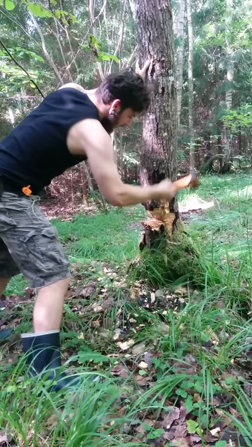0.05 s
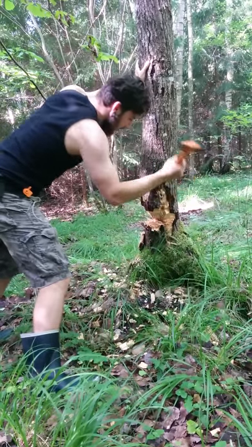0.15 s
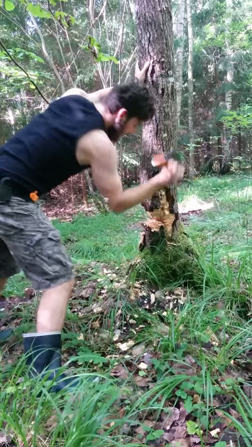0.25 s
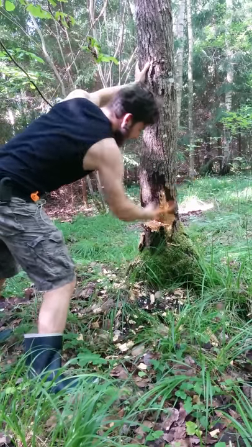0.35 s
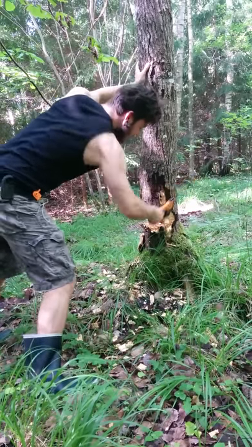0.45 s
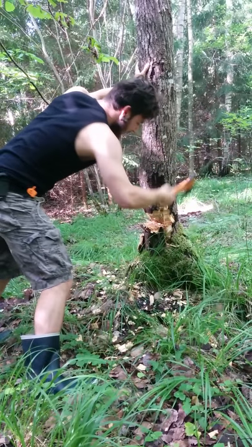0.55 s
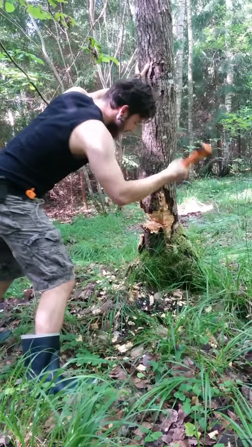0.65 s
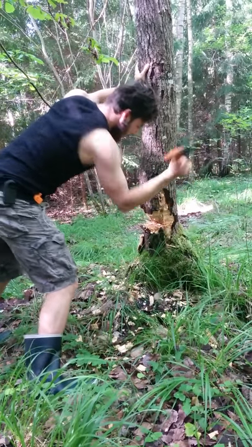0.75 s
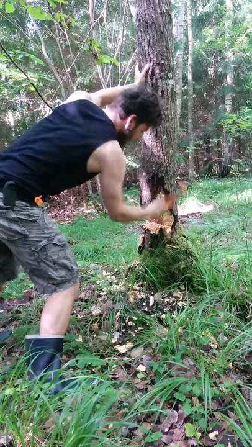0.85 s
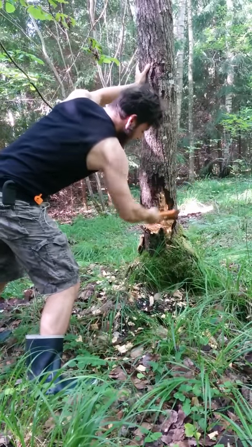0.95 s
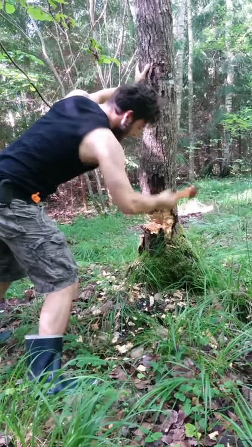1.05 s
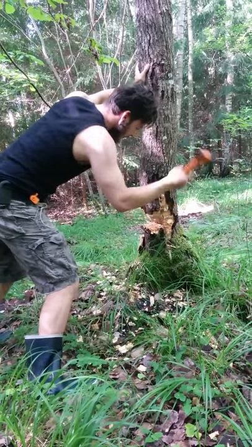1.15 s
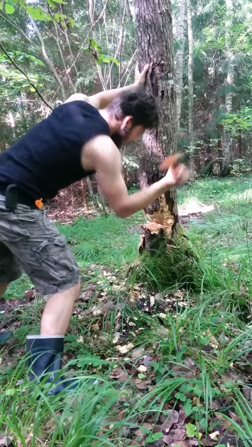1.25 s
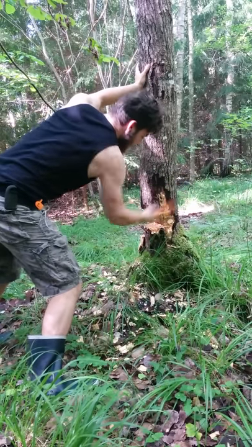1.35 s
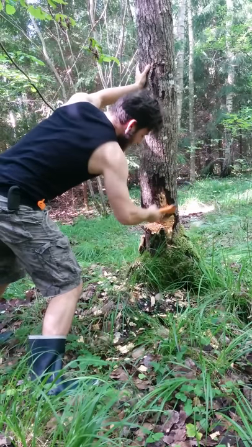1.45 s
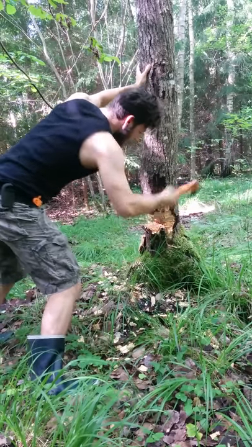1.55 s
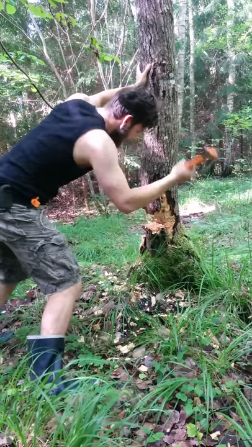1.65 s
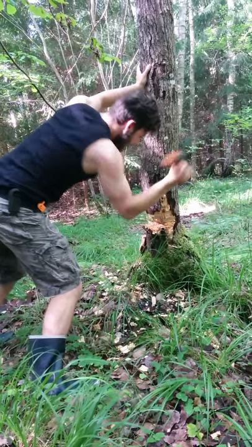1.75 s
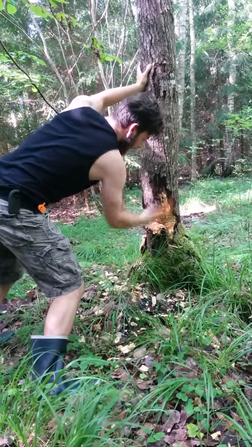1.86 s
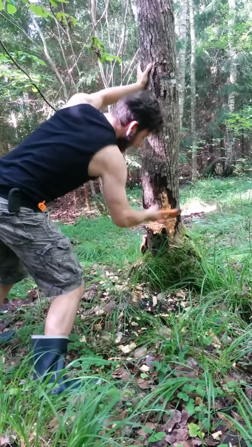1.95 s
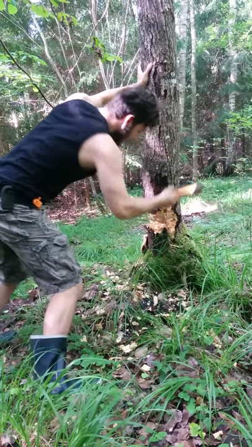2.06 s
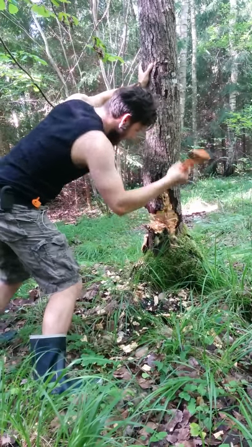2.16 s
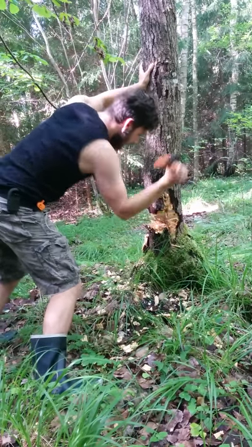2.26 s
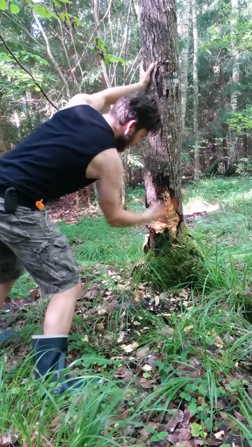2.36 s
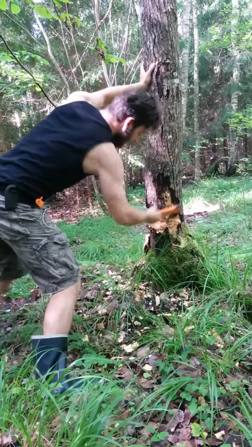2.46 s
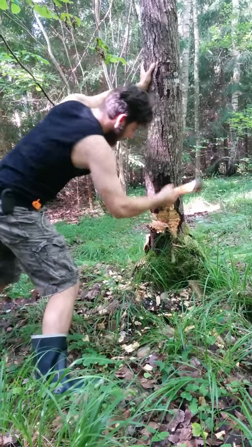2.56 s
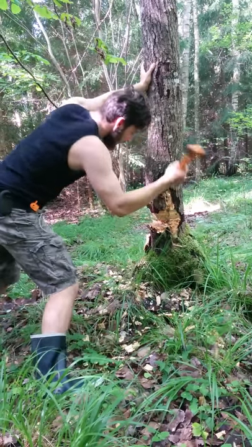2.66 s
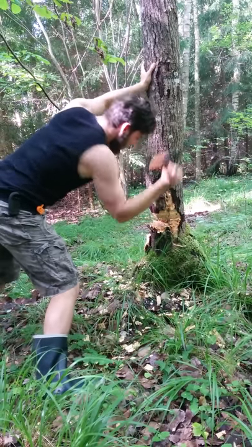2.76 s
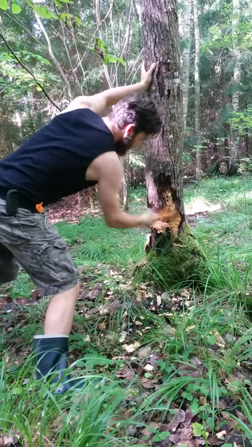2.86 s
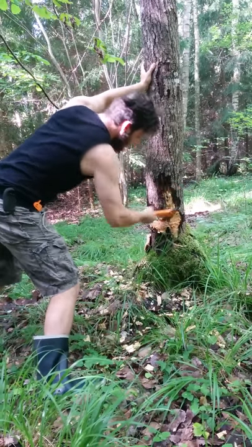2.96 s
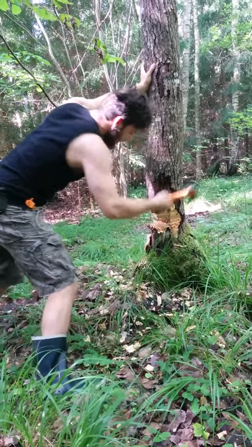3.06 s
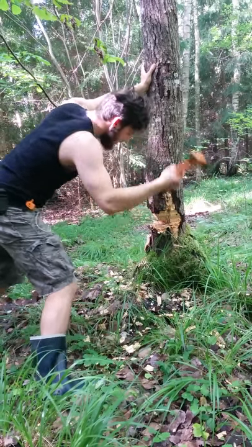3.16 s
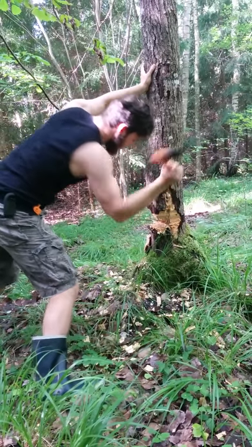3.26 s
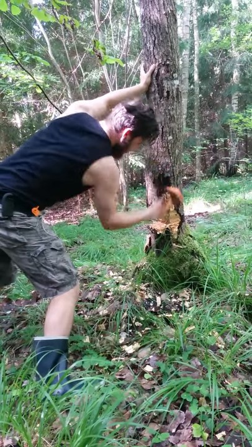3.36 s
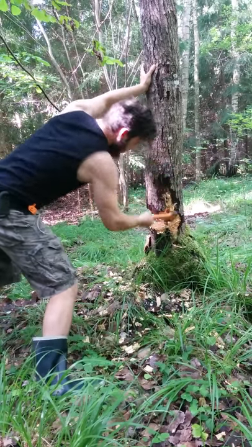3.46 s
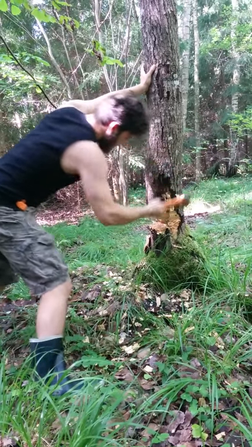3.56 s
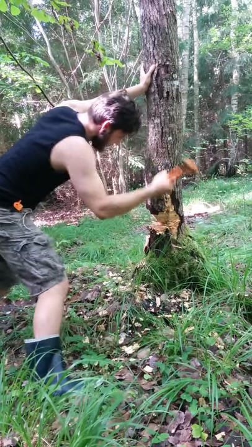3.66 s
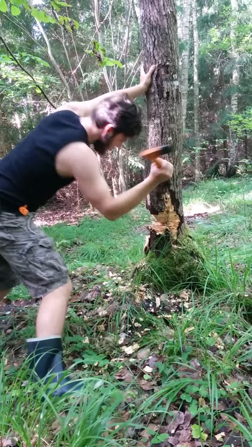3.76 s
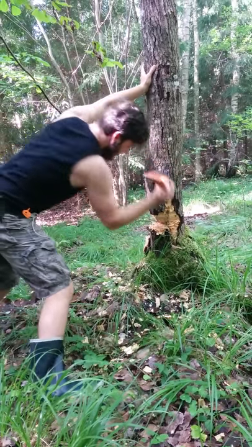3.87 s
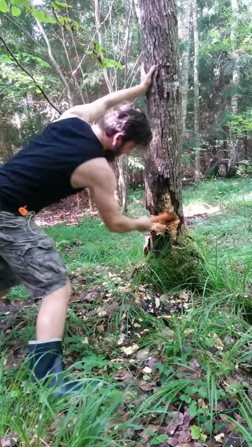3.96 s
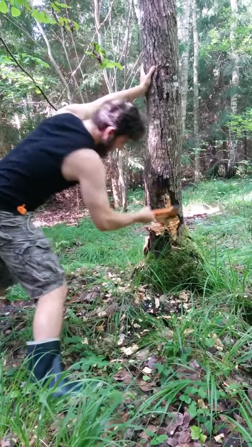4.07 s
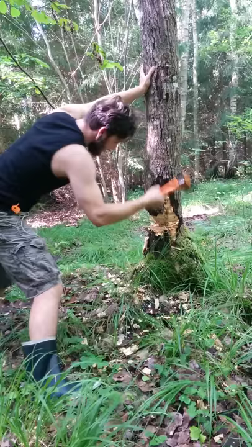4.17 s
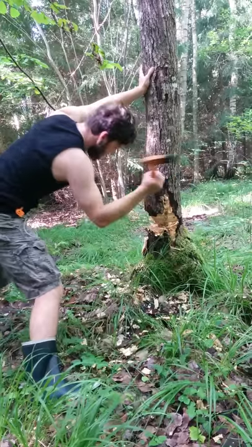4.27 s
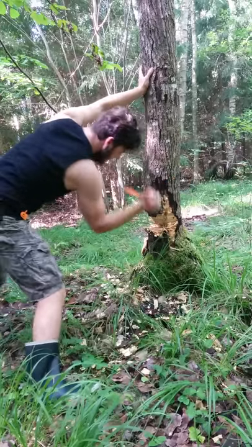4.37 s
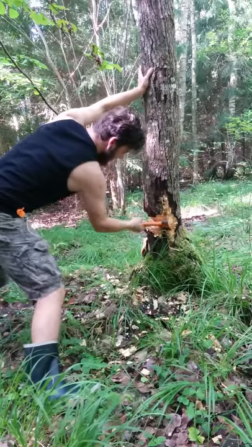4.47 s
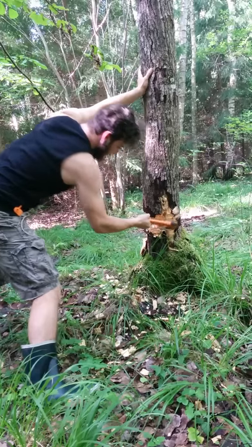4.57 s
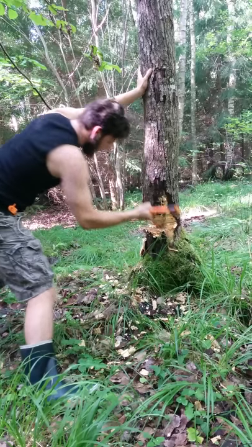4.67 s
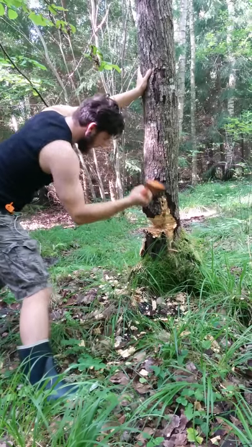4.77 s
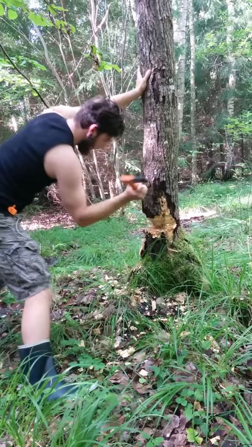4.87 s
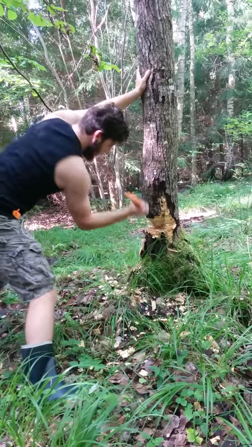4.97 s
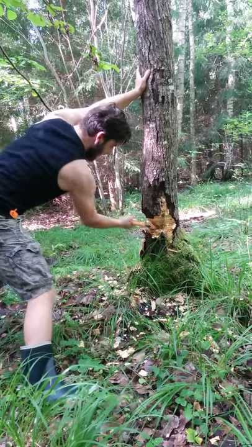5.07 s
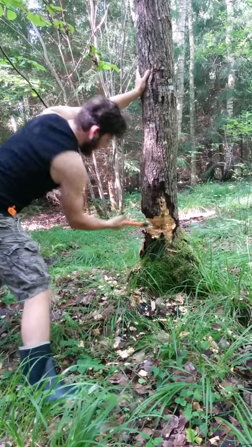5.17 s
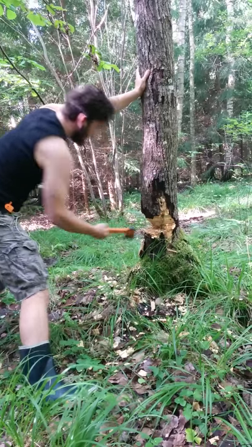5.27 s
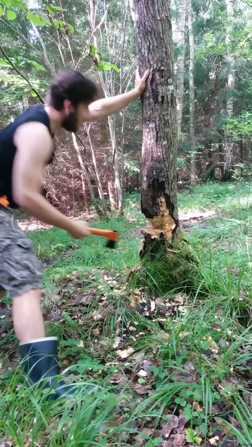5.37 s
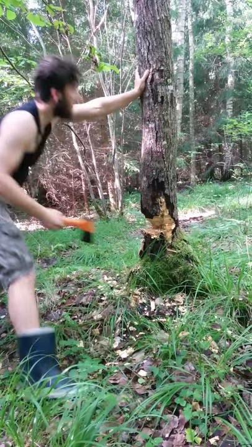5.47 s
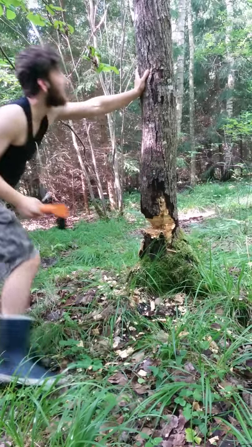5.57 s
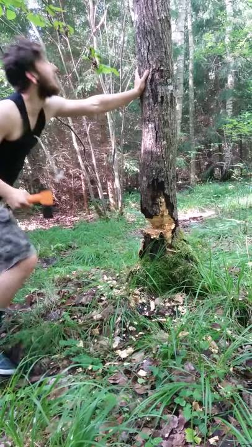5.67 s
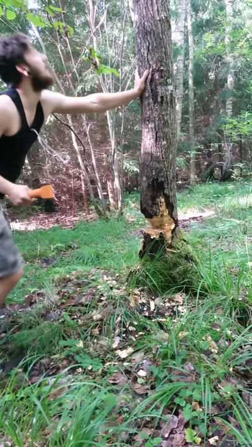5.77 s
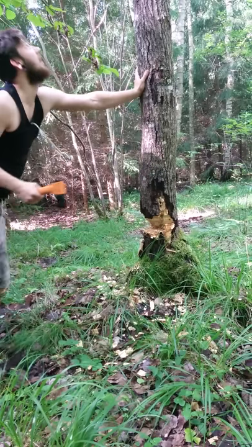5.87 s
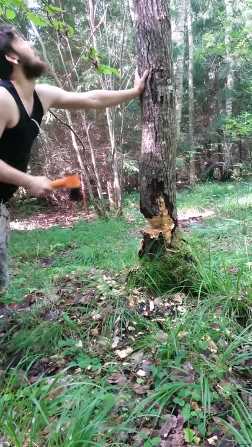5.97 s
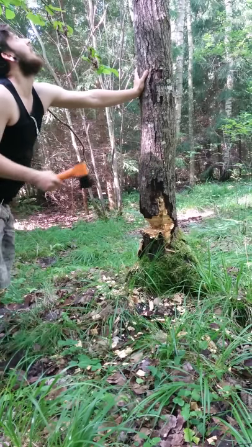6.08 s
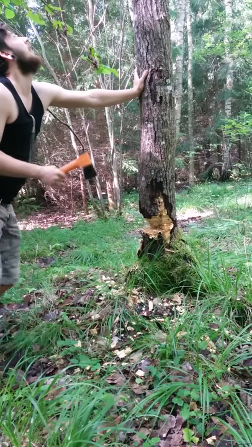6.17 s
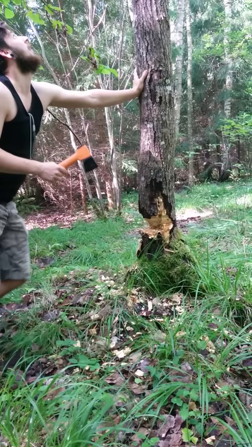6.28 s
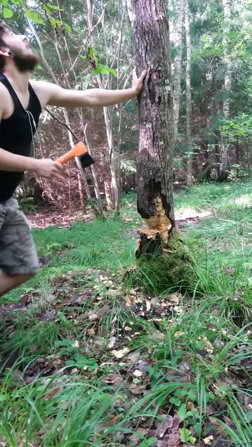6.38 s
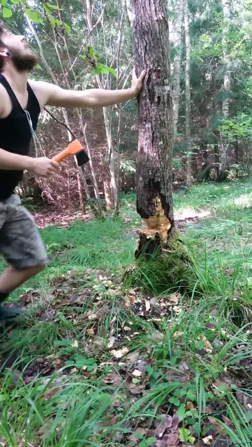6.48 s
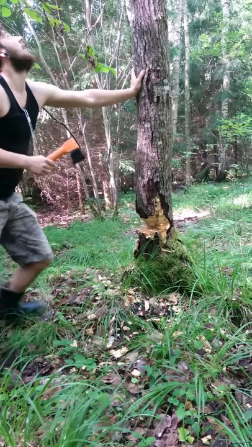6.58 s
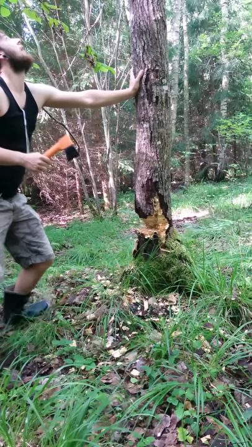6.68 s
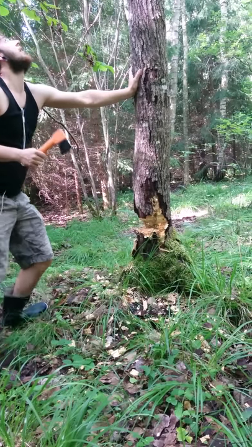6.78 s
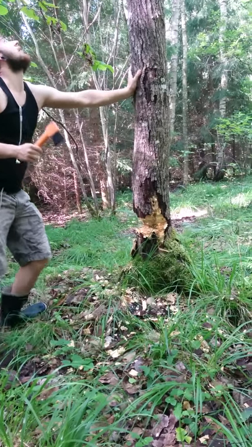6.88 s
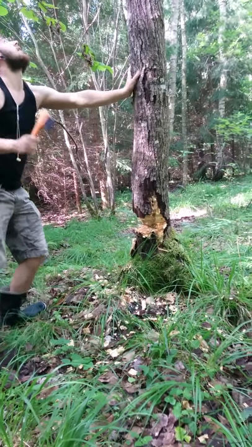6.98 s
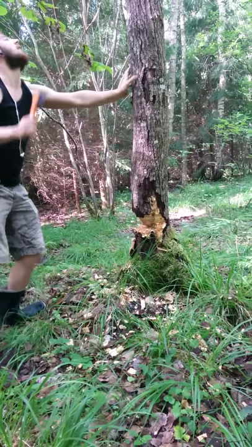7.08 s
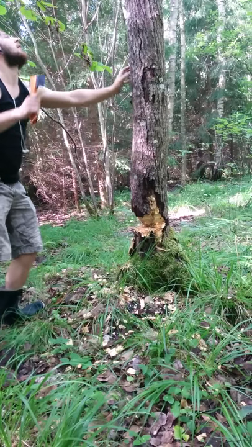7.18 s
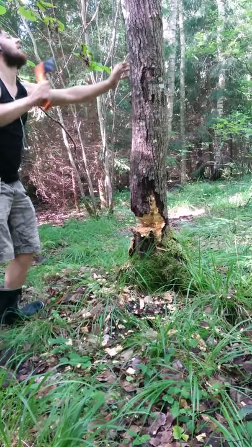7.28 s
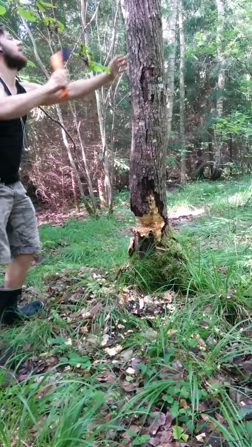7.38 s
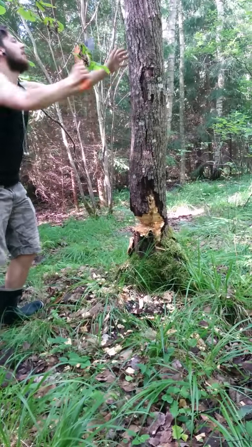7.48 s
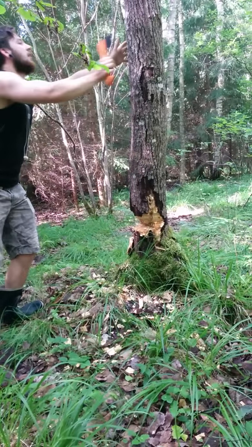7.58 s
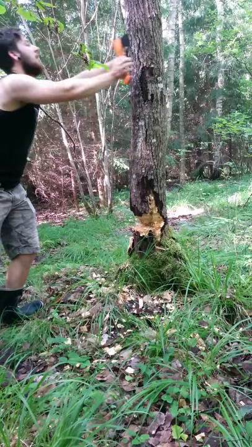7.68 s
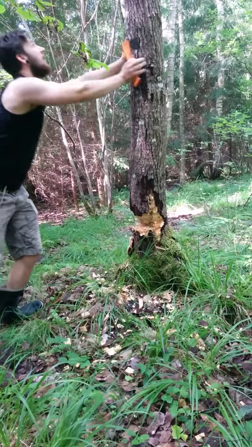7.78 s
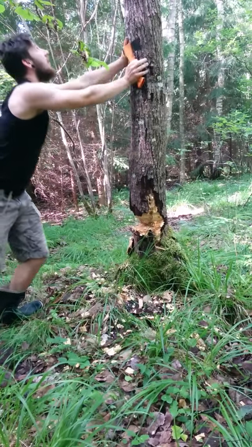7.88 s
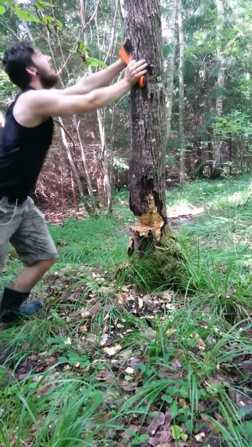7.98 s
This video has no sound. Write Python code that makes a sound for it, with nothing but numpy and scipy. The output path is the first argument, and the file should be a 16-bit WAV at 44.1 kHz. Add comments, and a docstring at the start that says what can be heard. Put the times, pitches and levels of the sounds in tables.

```python
"""Hatchet on a dry trunk

Forest, a phone microphone a few metres from the foot of a dry standing trunk: a hatchet chops eleven times.
Each bite snaps a burst of fibres that rings the wood and thumps the stem; nearby trees scatter it and
the far tree line echoes it. Chips drop; then the chopper steps back through grass, and something clicks
lightly. Ticks, steps and rustles are shaped bursts of noise over a faint, steady background hiss whose
level varies randomly in small patches of pitch and time."""
import sys
import numpy as np
from scipy import signal
from scipy.fft import rfft, irfft, next_fast_len
from scipy.io import wavfile
from scipy.ndimage import uniform_filter1d

SR = 44100
rng = np.random.default_rng(int(sys.argv[2]) if len(sys.argv) > 2 else 0)


def materialize(psi):
    """Save the field psi as 16-bit PCM at rate SR to the path in sys.argv[1].

    A 1-D psi becomes a single channel; in a 2-D psi each row is a channel.
    """
    bounded = np.clip(np.atleast_2d(psi).T, -1, 1)
    quanta = np.round(bounded * 32767).astype(np.int16)
    wavfile.write(sys.argv[1], SR, quanta)


N = 353858  # length of the scene in samples


def undb(db):
    """Decibels to gain."""
    return 10 ** (np.asarray(db) / 20)


def clock(seconds):
    """Sample times of a stretch, in seconds."""
    return np.arange(int(seconds * SR)) / SR


def decay(t, t60):
    """Exponential decay that falls by 60 dB in t60 seconds."""
    return np.exp(-np.log(1000) * t / t60)


def unit(x):
    """Scale to rms 1."""
    return x / np.sqrt(np.mean(x ** 2))


def burst(x, db):
    """Scale a short sound to the energy of 10 ms at this rms level."""
    return x * undb(db) * np.sqrt(SR / 100 / np.sum(x ** 2))


def add(out, start_s, x):
    """Mix x into out from its start time, cut off at the end of out."""
    i = max(int(start_s * SR), 0)
    out[i:i + len(x)] += x[:max(len(out) - i, 0)]


def band(x, lo_hz, hi_hz, order=3):
    """Causal band-pass."""
    edges = [lo_hz, min(hi_hz, SR / 2 - 1000)]
    return signal.sosfilt(signal.butter(order, edges, "band", fs=SR, output="sos"), x)


def colour(x, points):
    """Causal minimum-phase filter through (Hz, dB) points, made by folding the cepstrum."""
    size = 2048
    hz, db = np.transpose(points)
    bins_hz = np.arange(size + 1) * SR / 2 / size
    log_gain = np.log(undb(np.interp(np.log(bins_hz + 1), np.log(hz), db)))
    cepstrum = irfft(log_gain)
    cepstrum[1:size] *= 2
    cepstrum[size + 1:] = 0
    impulse = irfft(np.exp(rfft(cepstrum)))[:size]
    return signal.fftconvolve(x, impulse)[:len(x)]


def octave_split(x, per_octave=2):
    """Yield (centre Hz, part of x) for this many bands an octave, from 25 Hz up."""
    size = next_fast_len(len(x))
    spectrum = rfft(x, size)
    bins_hz = np.arange(size // 2 + 1) * SR / size
    step = 2 ** (1 / per_octave)
    for lo in 25 * step ** np.arange(per_octave * 19 // 2):
        inside = (bins_hz >= lo) & (bins_hz < lo * step)
        yield lo * np.sqrt(step), irfft(spectrum * inside, size)[:len(x)]


def ring(push, modes, detune):
    """Damped modes of alternating sign driven by a push; each call shifts their pitches slightly."""
    t = np.arange(len(push)) / SR
    response = np.zeros(len(push))
    for k, (hz, db, t60) in enumerate(modes):
        shifted_hz = hz * (1 + detune * rng.standard_normal())
        response += (-1) ** k * undb(db) * decay(t, t60) * np.sin(2 * np.pi * shifted_hz * t)
    return signal.fftconvolve(push, response)[:len(push)]


def snaps(t, length, rise=.0012, fall=0.0023, spread_db=3):
    """Dense fractures of uneven size that last as long as the contact, then fade (times in seconds)."""
    uneven_db = spread_db * np.minimum(rng.exponential(size=len(t)), 4)
    sizes = rng.standard_normal(len(t)) * undb(uneven_db)
    return sizes * np.minimum(t / rise, 1) * np.exp(-np.maximum(t - length, 0) / fall)


# Hatchet blows at the foot of the trunk, a few metres from the phone.
# Each row: start in seconds, bite length in seconds, force in dB relative to a full swing,
# sharpness in dB (how cleanly the edge enters), thud in dB (how squarely it shoves the stem),
# chip pitch in Hz, and sound thrown towards the trees in dB.
HATCHET_BLOWS = [(0.010, 0.0044, 0, 3.5, -43, 3370, -4), (0.514, 0.0071, -1, -1, -23, 1826, -6),
                 (1.043, .007, -1, .5, -26, 1830, -1), (1.532, 0.0087, 1, -0.8, -23.5, 1450, -3),
                 (2.034, 0.0072, 2, 2.5, -30, 4000, -7), (2.541, 0.0048, 1.5, -1, -23.5, 2800, -2),
                 (3.035, .0065, 0, -.5, -23.5, 2719, -8.5), (3.559, 0.0047, -1, -0.5, -22, 2662, -1.5),
                 (4.106, .007, -1, -1, -21, 1443, -5.5), (4.616, 0.0049, -10.5, -2, -32.5, 1394, -8.5),
                 (5.187, 0.0078, -9, 1.5, -18.5, 1330, -7)]
# treble thrown into the forest: base in dB, the rest in dB per dB
TREBLE_DB, TREBLE_PER_FORCE, TREBLE_PER_SHARPNESS = 1.4, .55, 1
# what reaches the far tree line: base in dB, the rest in dB per dB
ECHO_DB, ECHO_PER_FOREST, ECHO_PER_FORCE, ECHO_PER_SHARPNESS = 2, .85, .55, 0.45
CHIP_FRONT_DB, CHIP_BACK_DB = -8, -19.5  # the chip's ring towards the microphone and away from it
# the chip's note carries farthest and colours the forest's lingering wash
CHIP_CARRY_DB, CHIP_WIDTH_HZ = 5, 310


def chopping(count=3):
    """Every blow with its answer from the forest; the cut radiates a different burst in each direction."""
    out, t = np.zeros(N), clock(.6)
    directions = [(near_trees(t), *far_trees(t)) for _ in range(count)]
    for start_s, bite_s, force_db, sharp_db, thud_db, chip_hz, forest_db in HATCHET_BLOWS:
        cut = (bite_s, *blow_levels(force_db, sharp_db, thud_db), chip_hz)
        add(out, start_s, chop(*cut, chip_db=CHIP_FRONT_DB))
        # hard, sharp blows carry farther and keep more treble
        treble_db = TREBLE_DB + TREBLE_PER_FORCE * force_db + TREBLE_PER_SHARPNESS * sharp_db
        echo_db = ECHO_DB + ECHO_PER_FOREST * forest_db
        echo_db += ECHO_PER_FORCE * force_db + ECHO_PER_SHARPNESS * sharp_db
        throw = [(400, 0), (1000, forest_db), (3200, forest_db), (5500, forest_db + treble_db)]
        for near, echo, wash in directions:
            outward = colour(chop(*cut, chip_db=CHIP_BACK_DB), throw)
            note = band(outward, chip_hz - CHIP_WIDTH_HZ / 2, chip_hz + CHIP_WIDTH_HZ / 2, order=1)
            answer = signal.fftconvolve(outward, near + undb(echo_db) * echo)
            answer += signal.fftconvolve(outward + undb(CHIP_CARRY_DB) * note, wash)
            add(out, start_s, answer / np.sqrt(count))
    return out


BODY_DB, BODY_PER_THUD = -14, .42  # the low mids follow the thud, dB per dB
KNOCK_DB, CRACK_DB, SPLINTER_DB = -16.5, -14.5, -22  # mids, upper mids and treble of a full swing
# dB per dB; the crack follows the force fully, so weak blows sound dull
KNOCK_PER_FORCE, SPLINTER_PER_FORCE = .4, 0.75
CRACK_PER_SHARPNESS = .2  # dB per dB; sharpness mostly trades knock for splinter


def blow_levels(force_db, sharp_db, thud_db):
    """Levels of thud, body, knock, crack and splinter: hard, clean cuts are bright, weak or blunt ones knock."""
    body_db = BODY_DB + BODY_PER_THUD * thud_db
    knock_db = KNOCK_DB + KNOCK_PER_FORCE * force_db - sharp_db
    crack_db = CRACK_DB + force_db + CRACK_PER_SHARPNESS * sharp_db
    splinter_db = SPLINTER_DB + SPLINTER_PER_FORCE * force_db + sharp_db
    return thud_db, body_db, knock_db, crack_db, splinter_db


# Snapping dry fibres at the cut. Each row: frequency in Hz, relative level in dB.
FIBRE_COLOUR = [(100, -8), (500, 2.5), (800, 1.5), (1400, 4), (3500, 4), (5000, -1), (7500, -1.5),
                (10000, -10), (13000, -16), (16000, -24)]
# Modes of the notch with the blade in it. Each row: frequency in Hz, relative level in dB, t60 in seconds.
NOTCH_MODES = [(970, -8.5, .03), (1245, -6, .04), (1496, 6, 0.025), (1783, -7, 0.012), (2200, -3, 0.059),
               (2310, -6.5, 0.0088), (2830, 8.5, 0.055), (2826, -3.5, 0.075), (4050, 3.5, .03),
               (4860, -6.5, 0.04), (5824, 1.5, .02), (6270, 5.5, 0.073)]
# Low modes of the standing stem. Each row: frequency in Hz, relative level in dB, t60 in seconds.
STEM_MODES = [(85.5, -6.5, 0.051), (139, -0.5, 0.093), (200, -6, 0.13), (254.6, -5, 0.15), (315, -3, .12),
              (372, -9, 0.17), (431, -7, .12), (545, -3, 0.12), (662, -10.5, 0.11)]


def chop(bite_s, thud_db, body_db, knock_db, crack_db, splinter_db, chip_hz, chip_db):
    """The blade tears fibres until it stops; they ring the notch and the chip, and the shove rocks the stem."""
    t = clock(.15)
    tear = colour(snaps(t, bite_s, spread_db=3.5), FIBRE_COLOUR)
    notch = ring(tear, NOTCH_MODES, detune=0.018)
    chip = ring(tear, [(chip_hz, 0, .014)], detune=.003)
    wood = burst(tear, 0) + burst(notch, -11) + burst(chip, chip_db)
    # the brittle surface gives way at once, in one short bright snap
    surface = snaps(t, 0.0025, rise=0.0033, fall=0.00032) * np.minimum(t / 0.0033, 1)
    edge = burst(colour(surface, FIBRE_COLOUR), -1.4)
    shove = np.exp(-((t - .0035) / 0.000092) ** 2)
    stem = ring(shove, STEM_MODES, detune=0.035)
    thud = band(stem, 56, 180, order=2)
    # blade and stem share the low mids
    body = burst(band(stem, 250, 800), -1.3) + burst(band(tear, 260, 700), -3.0)
    knock = band(wood, 930, 2000)
    crack = band(wood, 2000, 4300)
    splinter = band(wood + edge, 4300, 17000)
    low = burst(thud, thud_db) + burst(body, body_db)
    return low + burst(knock, knock_db) + burst(crack, crack_db) + burst(splinter, splinter_db)


BUMP_S, BUMP_DB, BUMP_HZ = 4.616, -28.5, 38  # a deep bump under the tenth, glancing blow


def bump(t60=0.047):
    """A single, heavily damped low swing."""
    t, out = clock(.2), np.zeros(N)
    swing = np.sin(2 * np.pi * BUMP_HZ * t) * decay(t, t60)
    add(out, BUMP_S, burst(swing, BUMP_DB))
    return out


# Scatter from the ground and nearby trees. Each row: frequency in Hz, starting level in dB, t60 in seconds.
NEAR_SCATTER = [(70, -41.5, 0.23), (140, -40, 0.12), (302, -29.5, 0.14), (556, -31.5, 0.21),
                (785.3, -39, 0.4), (1300, -35, .36), (2580, -36, .33), (4030, -33, 0.27),
                (6534, -31, 0.098), (10400, -38, 0.24), (16000, -41, 0.24)]


def near_trees(t):
    """Response of ground and nearby trunks: dense reflections that fade at a different rate in each band."""
    hz, db, t60 = np.transpose(NEAR_SCATTER)
    out = np.zeros(len(t))
    for centre_hz, part in octave_split(rng.standard_normal(len(t))):
        band_db = np.interp(np.log(centre_hz), np.log(hz), db)
        band_t60 = np.interp(np.log(centre_hz), np.log(hz), t60)
        out += part * undb(band_db) * decay(t, band_t60)
    return out * np.clip((t - .004) / 0.0063, 0, 1)  # the first reflections come after 4 ms


# Echo of the far tree line. Each row: frequency in Hz, relative level in dB.
TREE_LINE_COLOUR = [(60, -18), (140, -13), (500, -20), (800, -11), (1150, 2), (1550, -2.5), (2000, -1.5),
                    (2700, 2.5), (4000, -0.5), (4800, -7), (8000, -6.5), (16000, -12)]


def far_trees(t, arrive=.11, swell=0.016, t60=0.51, linger_t60=1.0, treble_loss_db=55):
    """Responses of the tree line beyond the clearing: its echo, and a faint lingering wash (in seconds)."""
    trunks = colour(unit(snaps(t, t[-1], spread_db=4.5)), TREE_LINE_COLOUR)  # trunks answer unevenly
    # the longer the path, the more treble is lost: dB per second at 8 kHz and above
    trunks = sum(part * undb(-treble_loss_db * t * min(hz / 8000, 1) ** 2)
                 for hz, part in octave_split(trunks))
    echo = np.exp(np.minimum(t - arrive, 0) / swell) * decay(np.maximum(t - arrive, 0), t60)
    wash = np.minimum(t / arrive, 1) * decay(t, linger_t60)
    return undb(-53.5) * trunks * echo, undb(-63.5) * trunks * wash


# Falling chips, light clicks and a scrape on bark; levels are those before the noise gate.
# Each row: start in seconds, level in dB, pitch in Hz, contact length in seconds.
CHIP_TICKS = [(0.225, -57, 4060, 0.0096), (1.37, -53, 2240, 0.0089), (2.906, -54, 8550, 0.032),
              (4.423, -53, 1021, 0.0038), (5.36, -49.5, 10900, 0.0045), (5.719, -55.5, 2475, 0.0096),
              (6.616, -44.5, 3500, 0.0066), (7.94, -51, 1540, 0.0148)]


def ticks():
    """Small hard contacts: short narrow bursts of snaps, each scattered by the nearby trees."""
    out, t = np.zeros(N), clock(.2)
    for start_s, db, hz, length in CHIP_TICKS:
        tick = burst(band(snaps(t, length), hz / 1.5, hz * 1.2), db)
        scattered = signal.fftconvolve(tick, near_trees(t))[:len(t)]
        add(out, start_s, tick + undb(-6.5) * scattered)
    return out


# Boots on soft ground. Each row: start in seconds, heel level in dB before the gate, heel pitch in Hz.
BOOT_STEPS = [(5.722, -64, 266), (5.941, -54.5, 250), (6.744, -45, 215), (7.922, -56.5, 140)]
SOLE_LAG_S, SOLE_DB, SOLE_PITCH_RATIO = 0.022, -3, 1.16  # the sole lands after the heel, softer and higher


def steps():
    """Dull heel-and-sole steps: soft ground gives slowly, so each contact is a rounded low burst."""
    out, t = np.zeros(N), clock(.2)
    for start_s, heel_db, heel_hz in BOOT_STEPS:
        heel = (0, heel_db, heel_hz)
        sole = (SOLE_LAG_S, heel_db + SOLE_DB, heel_hz * SOLE_PITCH_RATIO)
        for lag_s, db, hz in (heel, sole):
            press = snaps(t, 0.0056, rise=0.0078, fall=0.012)
            add(out, start_s + lag_s, burst(band(press, hz / 1.6, hz * 1.62, order=2), db))
    return out


# Grass and leaves stirred by boots and chips.
# Each row: start in seconds, length in seconds, level in dB before the noise gate.
GRASS_RUSTLES = [(0.615, 0.22, -63), (1.223, 0.2, -67), (2.6, 0.16, -70), (5.599, 0.31, -60.5),
                 (5.857, 0.31, -63.5), (6.729, 0.23, -64), (7.2, 0.4, -74.5), (7.777, 0.27, -72.5)]
# Tone of the grass. Each row: frequency in Hz, relative level in dB.
GRASS_COLOUR = [(300, 3), (1500, 1.5), (4500, -12.5), (7000, 0.5), (11000, -1.5), (16000, -21.5)]
RUSTLE_RISE_SHARE = 0.24  # grass is pushed aside quickly and settles slowly


def rustles():
    """The fine crackle of grass: uneven snaps of many blades that swell and settle."""
    out = np.zeros(N)
    for start_s, length, db in GRASS_RUSTLES:
        blades = snaps(clock(length), length, spread_db=5.0)
        progress = np.linspace(0, 1, len(blades))
        stir = np.interp(progress, [0, RUSTLE_RISE_SHARE, 1], [0, 1, 0])
        add(out, start_s, undb(db) * unit(colour(blades, GRASS_COLOUR) * stir))
    return out


# Faint background hiss at the microphone. Each row: frequency in Hz, relative level in dB.
HISS_COLOUR = [(30, -7.5), (120, -3), (400, -1), (720, 0), (1250, -6), (2000, -4.5), (2700, -2.5),
               (3800, -9), (4800, -17), (8000, -15), (12000, -19.5), (16000, -24.5)]


def background_hiss(level_db=-64, patch_db=3.0):
    """A faint, steady hiss whose level varies randomly in small patches of pitch and time; level before the gate."""
    size = 2048
    cells = signal.stft(colour(rng.standard_normal(N), HISS_COLOUR), nperseg=size)[2]
    patches = uniform_filter1d(rng.standard_normal(cells.shape), size=11, axis=0)  # across pitch
    patches = uniform_filter1d(patches, size=3, axis=1)  # across time
    hiss = signal.istft(cells * undb(patch_db * unit(patches)))[1][:N]
    return unit(hiss) * undb(level_db)


def scene():
    """Chops, small sounds and background hiss at one microphone."""
    small_sounds = ticks() + steps() + rustles()
    return (chopping() + bump() + small_sounds + background_hiss())[None]


TOP_HZ = 16000  # upper limit of the phone's sound


def record(dry, ceiling=0.59, depth_db=10):
    """A noise gate turns quiet passages and tails down; peaks are rounded off and the top is cut."""
    power = np.abs(uniform_filter1d(dry ** 2, size=1400))  # over about 32 ms
    level_db = 10 * np.log10(power + 1e-12)
    quiet = np.clip((-48 - level_db) / 3.5, 0, 1)  # the gate starts to close below -48 dB
    gated = dry * undb(-depth_db * quiet)
    rounded = gated / (1 + (gated / ceiling) ** 4) ** (1 / 4)
    return signal.sosfilt(signal.ellip(8, .2, 70, TOP_HZ, fs=SR, output="sos"), rounded)


dry = scene()
out = record(dry)
materialize(out)
```